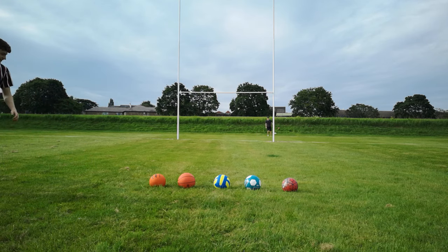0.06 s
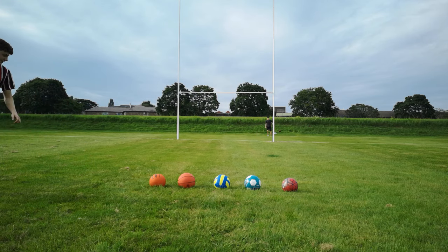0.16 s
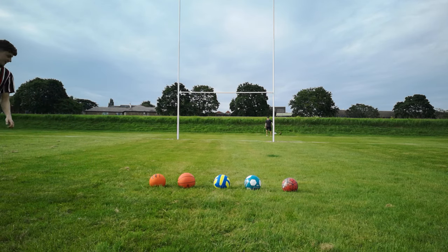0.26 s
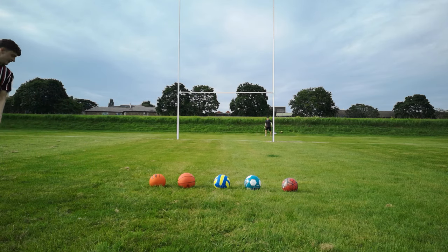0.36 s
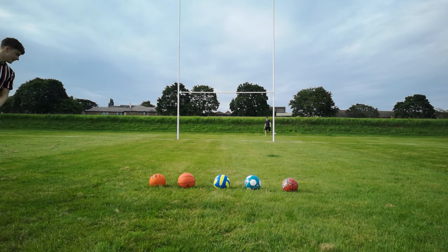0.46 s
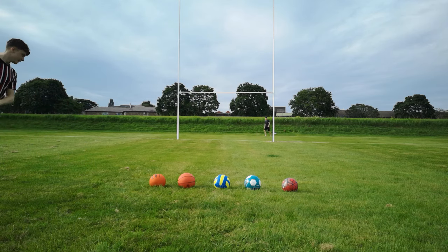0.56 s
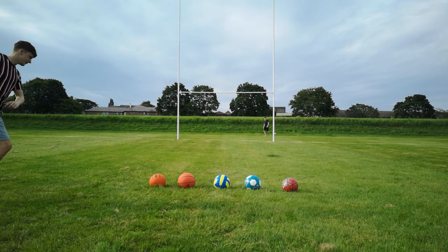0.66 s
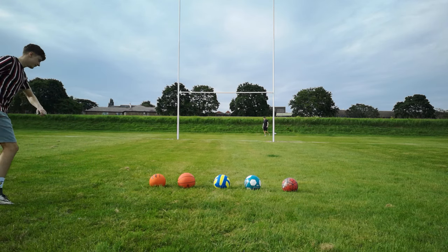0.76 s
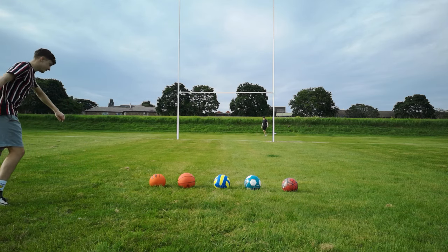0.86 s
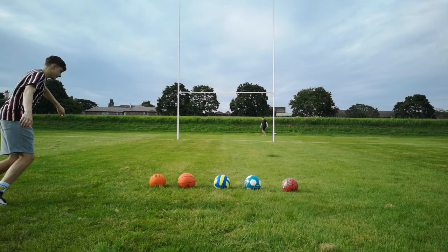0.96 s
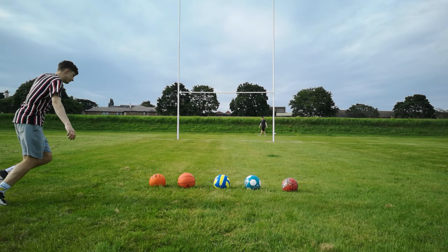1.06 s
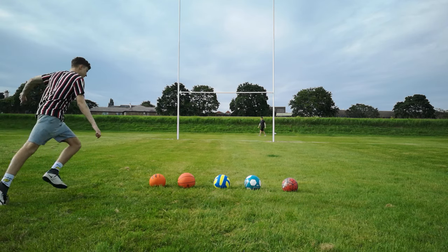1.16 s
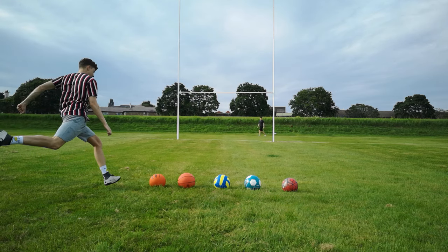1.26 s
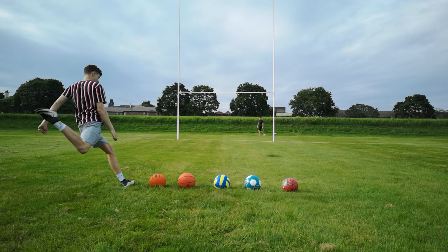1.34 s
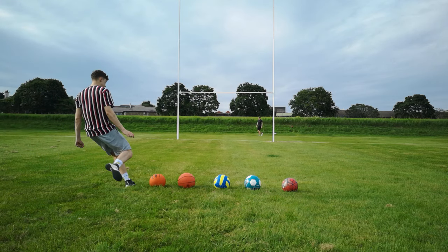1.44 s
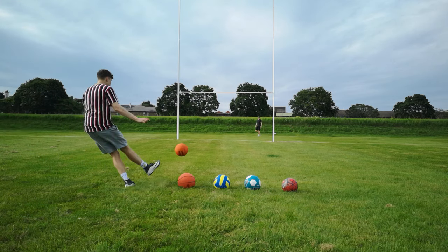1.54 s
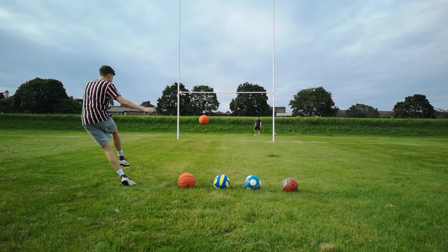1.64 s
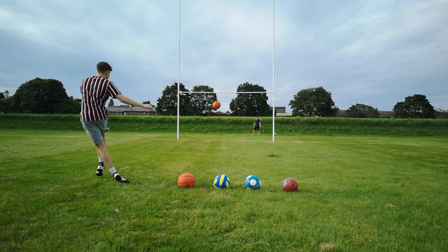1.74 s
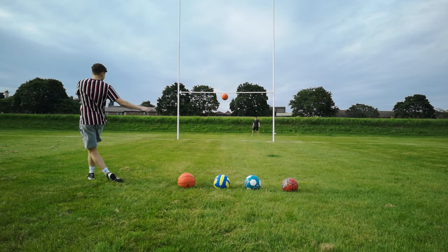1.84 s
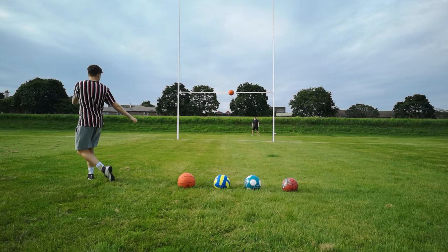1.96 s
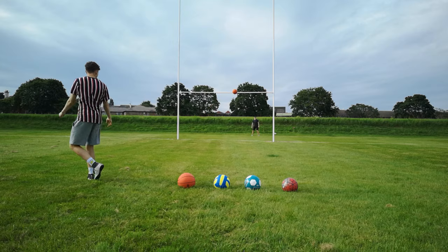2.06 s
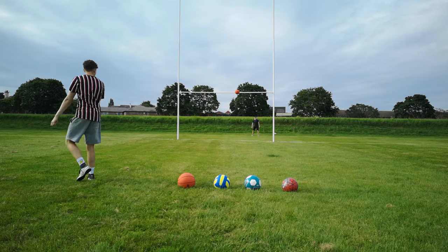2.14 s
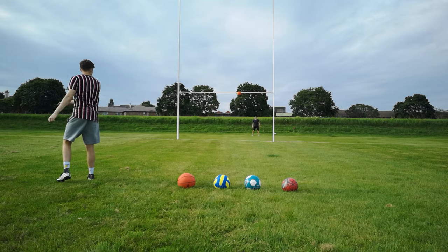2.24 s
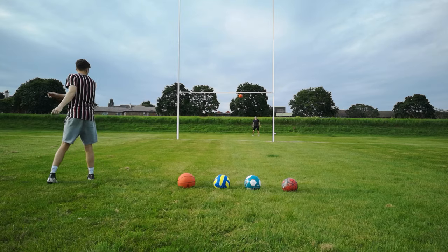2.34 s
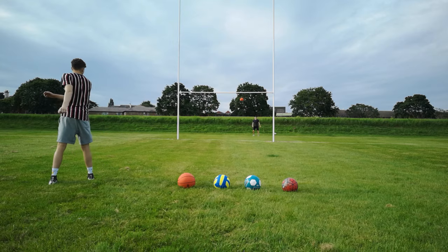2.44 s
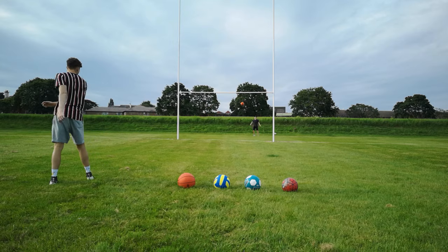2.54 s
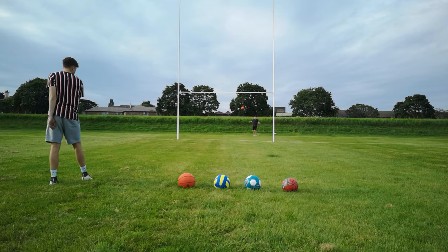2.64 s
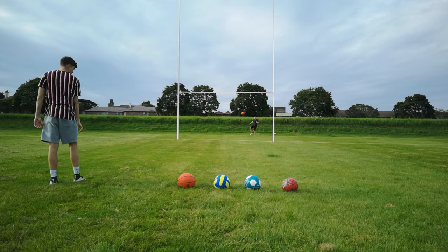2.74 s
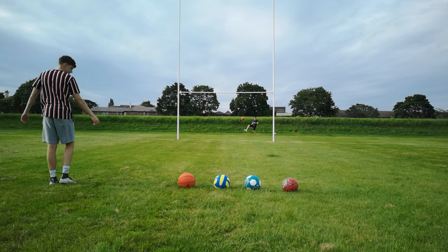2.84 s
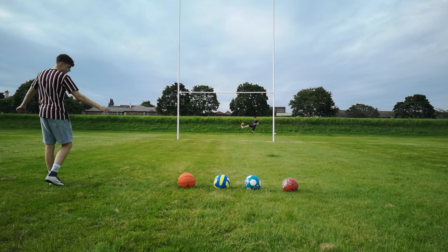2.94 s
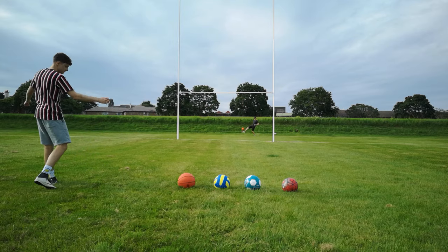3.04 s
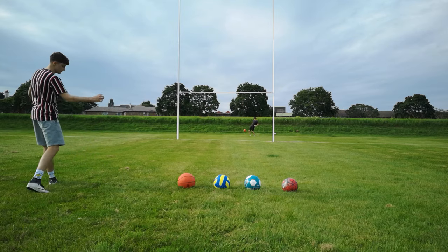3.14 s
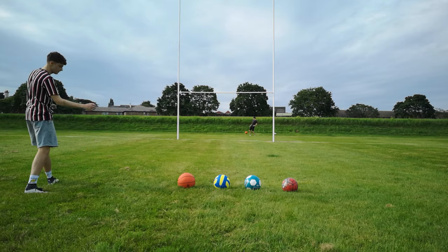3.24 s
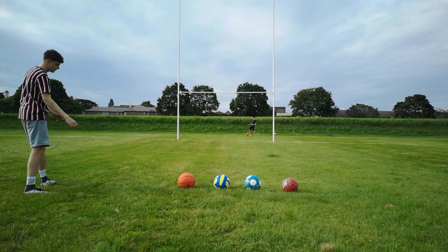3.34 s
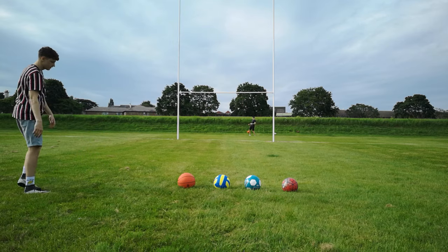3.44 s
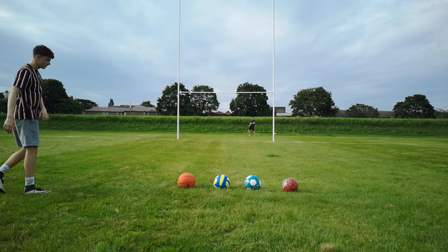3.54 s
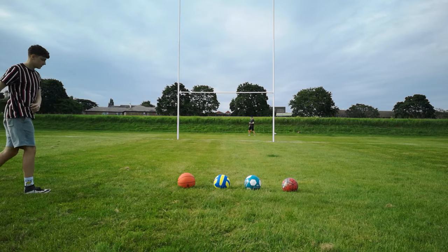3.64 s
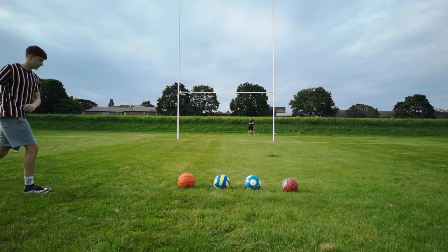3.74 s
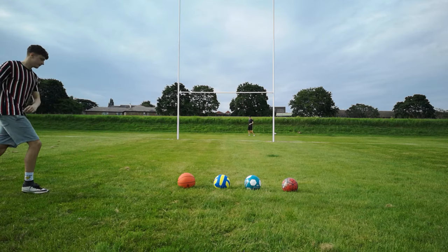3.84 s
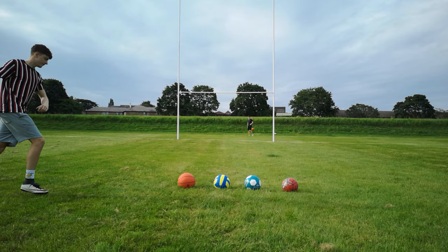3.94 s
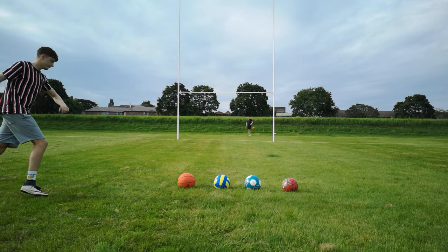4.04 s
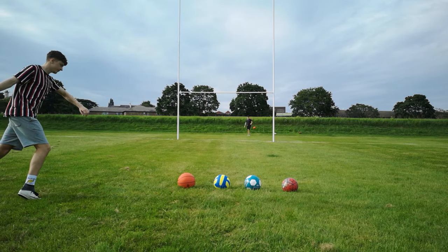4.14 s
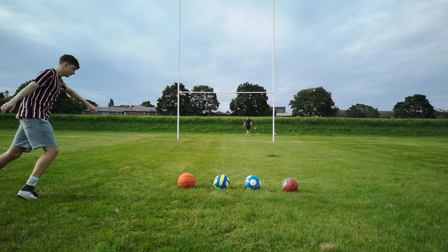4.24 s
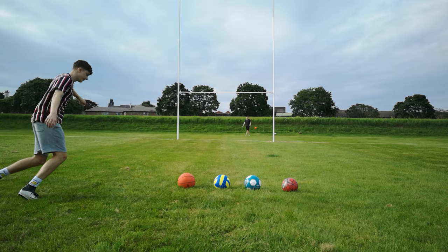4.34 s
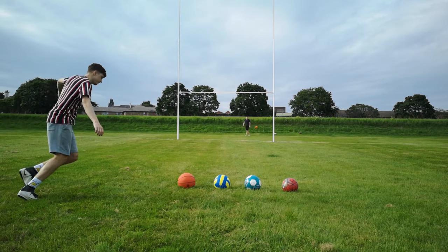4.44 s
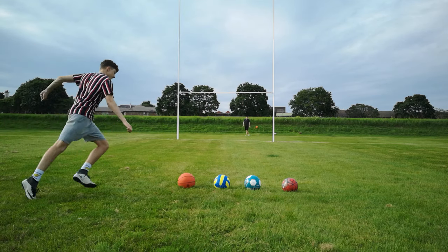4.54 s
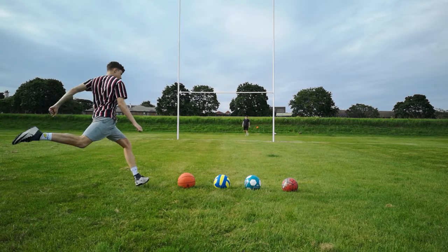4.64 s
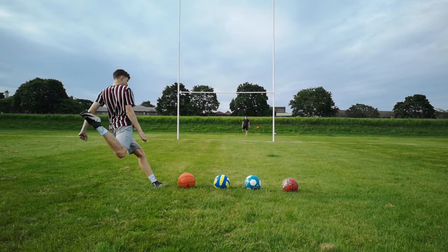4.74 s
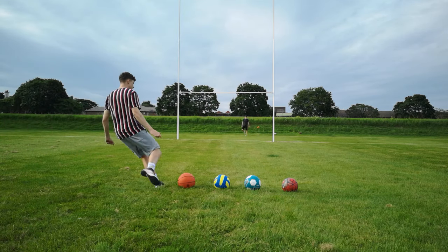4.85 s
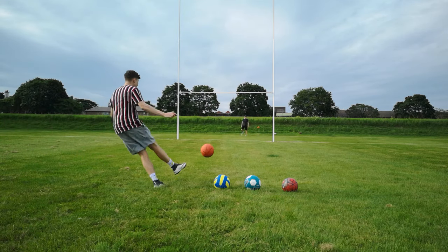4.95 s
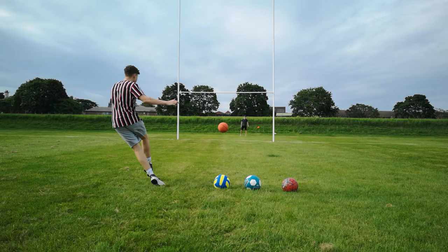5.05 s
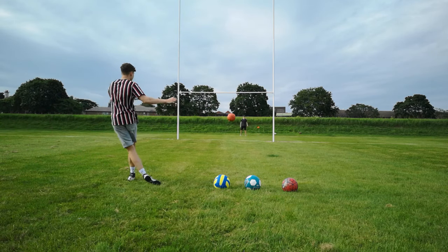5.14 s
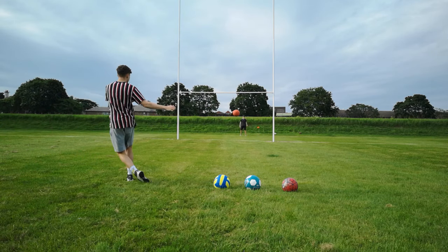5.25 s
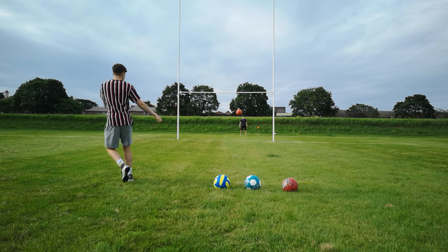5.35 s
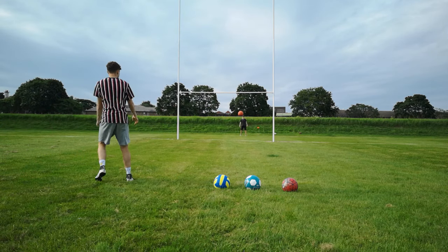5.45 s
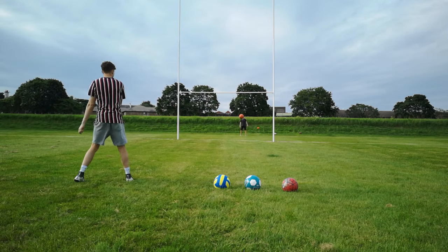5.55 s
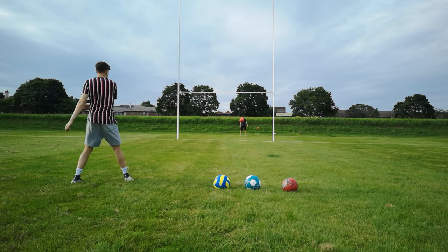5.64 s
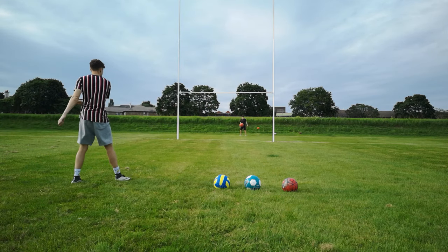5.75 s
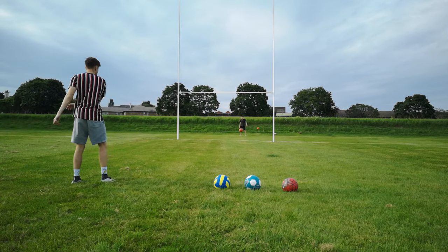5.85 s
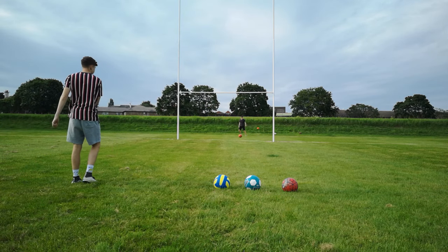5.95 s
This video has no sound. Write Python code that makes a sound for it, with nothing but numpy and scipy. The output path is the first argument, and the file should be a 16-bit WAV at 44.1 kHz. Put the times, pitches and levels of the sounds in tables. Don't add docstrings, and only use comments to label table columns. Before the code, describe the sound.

Two sharp booming ball kicks a few seconds apart on a quiet field, with soft footfalls, grass rustle and faint bird notes between.

```python
import sys
import numpy as np
from scipy import signal
from scipy.fft import rfft, irfft, next_fast_len
from scipy.io import wavfile
from scipy.ndimage import uniform_filter1d

SR = 44100
rng = np.random.default_rng(int(sys.argv[2]) if len(sys.argv) > 2 else 0)


def invert_db(x):
    u = np.asarray(x, float) / 20
    return 10 ** u


def log_audio(samples):
    frames = np.atleast_2d(samples).T
    limited = np.clip(frames, -1, 1)
    pcm = np.round(limited * 32767).astype(np.int16)
    wavfile.write(sys.argv[1], SR, pcm)


N = 264636
T = np.arange(N) / SR
LONG = next_fast_len(N)

# frequency in Hz, density in dB per Hz.
HISS_TONE = [(150, -31.5), (260, -7), (380, -7), (414, -8.5), (475, -10), (648, -8), (869, -4.5),
             (947, -6.5), (1010, -6), (1380, -10), (1760, -7), (5220, -20), (9870, -26.5), (11900, -27),
             (16000, -29.5)]
# frequency in Hz, density in dB per Hz.
RUMBLE_TONE = [(8.8, -36), (15, -1.5), (43, 1.5), (59, 0), (76, -4), (103, -8), (196, -18), (249, -21),
               (300, -32.5), (390, -62.5), (660, -120)]
# time in seconds, level in dB.
RUMBLE_HEAVE = [
    (0.0, -65.5),
    (1.3, -64.5),
    (1.59, -59.5),
    (1.82, -64),
    (3.44, -66),
    (3.91, -65),
    (4.44, -67),
    (5.0, -62),
    (5.21, -63.5),
    (6.0, -65.5),
]
# frequency in Hz, left-right correlation from -1 to 1.
LIKENESS = [(60, 0.99), (130, 0.95), (290, 0.13), (640, -0.64), (1410, 0.15), (3100, -0.16), (6820, -0.05),
            (15000, -0.35)]
# start in seconds, level in dB, hold in seconds.
SWISHES = [(0.0, -85, 0.026), (.14, -87, 0.087), (.76, -89, 0.14), (1.05, -91.5, 0.056),
           (1.225, -82.5, 0.0064), (1.40, -88.5, 0.058), (1.64, -88, 0.19), (1.85, -85, .04),
           (1.98, -90, 0.13), (2.32, -91.5, .1), (2.74, -90, .36), (3.38, -88.5, 0.29), (3.8, -94.5, 0.088),
           (4.17, -91.5, 0.048), (4.41, -95, 0.029), (4.615, -84, .01), (4.73, -90.5, 0.21),
           (5.06, -87, .28), (5.58, -85.5, 0.033), (5.81, -87, 0.21)]
# frequency in Hz, density in dB per Hz.
RUSTLE_TONE = [(1500, -29), (3000, -14), (5200, -2.5), (6400, -7), (7500, -4), (8300, -7.5), (9200, 0),
               (10400, -10.5), (12500, -21.5), (15500, -27)]
# start in seconds, level in dB, t60 in seconds.
WASH = [
    (1.565, -65, .3),
    (4.955, -58.5, .5),
]
# frequency in Hz, density in dB per Hz.
WASH_TONE = [(100, -3), (200, 4), (400, -5), (1000, -6.5), (2500, -3.5), (5500, -10), (9000, -20.5),
             (15000, -35)]
# start in seconds, length in seconds, first pitch in Hz, last pitch in Hz, level in dB.
BIRD = [(2.365, 0.034, 2450, 2234, -74), (2.461, 0.12, 1880, 1670, -78), (2.856, 0.049, 2440, 2270, -69.5),
        (3.429, 0.04, 2424, 2280, -73), (3.5, 0.21, 1918, 2030, -78), (3.835, 0.054, 2379, 2170, -75),
        (4.12, 0.096, 2350, 2380, -79), (3.929, .04, 3800, 4200, -83), (4.201, 0.12, 3280, 3180, -82.5),
        (4.288, 0.079, 2500, 2350, -76.5), (4.70, .015, 4560, 5000, -86), (4.775, 0.012, 4600, 5000, -79),
        (4.86, 0.0092, 4680, 4970, -78), (5.458, 0.068, 4900, 4100, -85)]
# start in seconds, level in dB, ground pitch in Hz,
# decay in ms, crunch in dB.
STEPS = [(0.396, -52, 116.4, 5.5, -82), (1.231, -56.5, 366, 1.8, -62), (1.418, -46.5, 186, 2.6, -85),
         (1.424, -47, 75, 12, -53), (2.162, -54.5, 111.5, 8.6, -86.5), (2.373, -55.5, 99, 9.1, -81),
         (2.734, -61.5, 174, 5.3, -79), (3.179, -48.5, 241, 3.7, -85), (3.475, -58.5, 121, 6.3, -83),
         (3.959, -49, 125, 4.4, -83), (4.614, -53.5, 225.5, 4.8, -63), (4.816, -50, 223, 2.4, -83),
         (4.818, -54.5, 93.4, 6.4, -55.5), (4.840, -64, 121, 5.8, -61.5), (5.549, -51.5, 90.6, 7.8, -85)]
# frequency in Hz, density in dB per Hz.
CRUNCH_TONE = [(180, -28.5), (300, -5.5), (674, -11), (1120, -8.5), (2830, -18), (4720, -33), (7020, -27),
               (8990, -25), (11100, -41.5), (15500, -49.5)]
# contact in seconds, blades in dB, blade lead in ms, crumbs in dB, # crumb fade
# in ms, low echo in dB.
SWEEPS = [
    (1.559, -45, 14, -40, 11.4, -44.5),
    (3.178, -68, 2.1, -54.5, 8, -62),
    (4.951, -50.5, 14, -35, 9.6, -41),
]
# frequency in Hz, density in dB per Hz.
BLADE_TONE = [(350, -30), (600, 6.5), (2040, -8.5), (2720, -9.5), (3290, -22.5), (5360, -10.5), (6490, -19),
              (9240, -9.5), (11600, -25.5), (14100, -24), (15500, -37)]
# frequency in Hz, density in dB per Hz.
CRUMB_TONE = [(350, -34.5), (600, -6), (1030, -4), (2910, -8.5), (5220, -19.5), (5980, -18), (6490, -31.5),
              (9240, -20.5), (11600, -39), (14900, -35.5), (15500, -48.5)]
# pitch in Hz, level in dB,
# t60 in seconds, lobes per second, first null in seconds, left minus right in dB.
SMALL_BALL = [(1014.6, -51, .14, 6.0, -.08, 7.5), (1583, -66.5, 0.26, 6.0, -.05, -5),
              (2207, -59, 0.32, 8.0, .012, 1), (2920, -69, 0.85, 11.0, .075, 8),
              (3326, -67, 0.13, 6.0, -0.049, 2.5), (3570, -69, 0.507, 6.1, 0.017, 2),
              (3810, -63, 0.1982, 7.41, -.05, -9), (4410, -59.5, .1, 6.0, -.04, -2.5),
              (4915, -75.5, .3, 5.0, -.05, 17), (5416, -76, .3, 5.0, -.05, 5.5),
              (5970, -76.5, 0.297, 4.95, -.05, 6)]
BIG_BALL = [(425, -40.5, 0.15, 3.5, -0.14, 3.5), (926, -59, 0.79, 2.6, -.07, 5),
            (1497, -64.5, 0.47, 10, .06, -3), (2005, -43.5, .33, 11, 0.014, -3),
            (2540, -51.5, 0.29, 12, -0.0059, 12), (2656, -55.5, 1.9, 5.0, 0.085, 2.5),
            (3020, -48.5, 0.27, 9.9, .024, 2.5), (3270, -57.5, 0.77, 2.3, 0.027, -1),
            (3510, -62, .8, 11, .08, 1.7), (3500, -66, .34, 5.3, -0.021, 0.2),
            (3880, -65, 0.74, 6.0, .12, -3), (3978, -55.5, .24, 6.6, 0.03, -2.5),
            (4350, -68.5, 0.32, 7.0, -.01, 1), (4463, -60, .26, 7.0, 0.00079, -4.5)]
# start in seconds,
# level in dB, centre in Hz, decay in ms, left minus right in dB.
ECHOES = [
    (1.6088, -43.5, 2260, 1.2, 2.5),
    (1.646, -59, 1320, 2.8, 0),
    (1.652, -60.5, 2220, 2.7, 1.5),
    (4.9606, -34.5, 1900, 2.2, 2.5),
    (4.9881, -43.5, 2270, 4.3, -0.5),
    (5.044, -57, 2160, 2.5, 4),
    (5.088, -64, 2170, 1.8, 8),
]
# start in seconds, level in dB, decay in ms, left minus right in dB,
# right ear delay in ms.
SLAPS = [
    (1.56, -17.5, 1.0, 6.5, 0.29),
    (3.1771, -39.5, 2.3, 3, 0.021),
    (4.9503, -11.5, 1.08, 5, 0.029),
]
# frequency in Hz, density in dB per Hz.
SLAP_TONES = [
    [(480, -37), (900, -0.5), (1670, -9), (2150, 0), (2770, -16), (3700, -13), (6070, -18), (6550, -30),
     (7820, -33.5), (8990, -12.5), (10300, -46.5), (12000, -41), (15500, -48.5)],
    [(590, -56), (1000, -20), (1320, -7.5), (1790, -10), (2970, -1), (4390, -6.5), (4810, -15), (5780, 6),
     (6560, -13.5), (7700, -5), (8250, -31), (9250, -7.5), (10700, -37), (14300, -44), (15500, -54)],
    [(450, -27.5), (720, 0.5), (1790, -8), (2760, -1.5), (3950, -9.5), (4830, -23), (5680, -10),
     (6430, -30.5), (7640, -11.5), (8550, -17), (9320, -6), (10400, -29.5), (12200, -46), (13400, -36),
     (15500, -50.5)],
]
# start in seconds, level in dB, breathing in Hz, peak in ms,
# width in ms, rise in ms.
THUDS = [
    (1.56, -3, 111.4, 1.9, 7.56, 0.26),
    (3.1768, -30.5, 108, 7.3, 7.2, 1.3),
    (4.9502, -3.5, 109.3, 3.5, 7.0, 0.11),
]
# multiple of breathing pitch, share, duration in ms.
WOBBLE = [
    (2.0, 0.035, 6),
    (3.0, -0.022, 12),
]

HISS_DB = -72.5
SWISH_RISE_S, SWISH_FALL_S = .03, 0.039
THUD_ECHO_PEAK_MS, THUD_ECHO_WIDTH_MS = 27, 13
LOBE_FILL = 0.19
SPHERE_HZ = 447
CROWD_DB, CROWD_DB_PER_KHZ, CROWD_SCATTER_DB = -69, -4, 3.5
CROWD_T60_S, CROWD_LOBES_HZ = 0.49, 7
FLIGHT_S = .62
MIC_LOW_HZ = 30.2


def on_log(table, n):
    hz, value = np.transpose(table)
    bin_hz = np.arange(n // 2 + 1) * SR / n
    return np.interp(np.log(bin_hz + 1), np.log(hz), value)


def noise(tone, n):
    x = irfft(rfft(rng.standard_normal(n)) * invert_db(on_log(tone, n)), n)
    return x / x.std()


def ringing(tone, n=1024):
    cepstrum = irfft(np.log(invert_db(on_log(tone, n))), n)
    cepstrum[1:n // 2] *= 2
    cepstrum[n // 2 + 1:] = 0
    response = irfft(np.exp(rfft(cepstrum)), n)[:n // 2]
    return response / np.sqrt(np.sum(response ** 2))


def crackle(decay_ms, n=1024):
    shape = np.exp(-np.arange(n) * 1000 / SR / decay_ms)
    x = rng.standard_normal(n)
    for _ in range(6):
        spectrum = rfft(x * shape)
        x = irfft(spectrum / np.abs(spectrum), n)
    x = x * np.sqrt(shape)
    return x * np.sqrt(np.sum(shape ** 2) / np.sum(x ** 2))


def walk(rate_hz):
    hold = int(SR / rate_hz)
    levels = np.repeat(rng.standard_normal(N // hold + 1), hold)
    return 2.2 * uniform_filter1d(uniform_filter1d(levels, hold), hold)[:N]


def add(out, s, x, pan_db=0., late_ms=0.):
    k = np.arange(len(x))
    left = x * invert_db(pan_db / 2)
    right = np.interp(k - late_ms * SR / 1000, k, x, left=0) * invert_db(-pan_db / 2)
    i = int(round(s * SR))
    out[:, i:i + len(x)] += np.array([left, right])[:, :N - i]


def diffuse(tone):
    likeness = np.clip(on_log(LIKENESS, LONG), -1, 1)
    gain = invert_db(on_log(tone, LONG))
    mid = rfft(rng.standard_normal(LONG)) * gain * np.sqrt(1 + likeness)
    side = rfft(rng.standard_normal(LONG)) * gain * np.sqrt(1 - likeness)
    pair = irfft([mid + side, mid - side], LONG)[:, :N]
    return pair / pair.std()


def hiss():
    return invert_db(HISS_DB + 0.39 * walk(1.3)) * diffuse(HISS_TONE)


def rumble():
    heave_db = np.interp(T, *np.transpose(RUMBLE_HEAVE))
    return invert_db(heave_db + 4.0 + 0.65 * walk(14)) * diffuse(RUMBLE_TONE)


def stirring():
    s, db, held = np.array(SWISHES).T[:, :, None]
    swell = -(np.minimum(T - s, 0) / SWISH_RISE_S) ** 2
    fall = -np.maximum(T - s - held, 0) / SWISH_FALL_S
    return np.sqrt(np.sum(invert_db(db) ** 2 * np.exp(swell + fall), axis=0))


def rustle():
    grain = stirring() * invert_db(4.5 + 2.1 * walk(72))
    return grain * np.array([noise(RUSTLE_TONE, LONG)[:N] for _ in range(2)])


def wash():
    fade = sum((T > s) * invert_db(db - 60 * np.maximum(T - s, 0) / t60) for s, db, t60 in WASH)
    return fade * diffuse(WASH_TONE)


def bird(out):
    for s, length, from_hz, to_hz, db in BIRD:
        u = np.arange(int(length * SR)) / (length * SR)
        phase = 2 * np.pi * np.cumsum(from_hz + (to_hz - from_hz) * u) / SR
        add(out, s, invert_db(db) * np.sin(np.pi * u) ** 0.86 * np.sin(phase), .1, 0.)


def steps(out):
    ms = np.arange(4096) * 1000 / SR
    for s, db, hz, decay, crunch_db in STEPS:
        thump = np.sin(2 * np.pi * hz * ms / 1000) * (ms / decay) * np.exp(1 - ms / decay)
        crunch = noise(CRUNCH_TONE, 4096) * (ms / 4.6) * np.exp(1 - ms / 3.62)
        add(out, s, invert_db(db) * thump + invert_db(crunch_db) * crunch, 2.5 * (hz / 330), .45)


def sweeps(out):
    ms = (np.arange(8192) - 2048) * 1000 / SR
    echo_shape = np.exp(-((ms - THUD_ECHO_PEAK_MS) / THUD_ECHO_WIDTH_MS) ** 2)
    echo_tone = [(30, -21.5), (70, -6), (130, -1.0), (260, -5.0), (450, -19), (1200, -46.5)]
    for s, blade_db, lead, crumb_db, fade, echo_db in SWEEPS:
        add(out, s - 2048 / SR, invert_db(echo_db) * noise(echo_tone, 8192) * echo_shape, 0., .4)
        blades = invert_db(blade_db) * np.exp(-(np.where(ms < 0, ms, 1.2 * ms) / lead) ** 4)
        dying = np.exp(-np.maximum(ms, 0) / fade) * (ms > 0)
        i = int(s * SR) - 2048
        for ear in out:
            grain = invert_db(2.7 * rng.standard_normal(256).repeat(32))
            patter = noise(CRUMB_TONE, 8192)
            dull = uniform_filter1d(patter, size=5)
            crumbs = invert_db(crumb_db) * (dull * dying + (patter - dull) * dying ** 2)
            ear[i:i + 8192] += grain * (blades * noise(BLADE_TONE, 8192) + crumbs)


def sphere(low=10.3, high=17.3):
    u, weight = np.polynomial.legendre.leggauss(40)
    x = np.arange(low, high, .004)
    shapes = np.polynomial.legendre.legvander(u, 16).T
    slope = [np.cos(np.outer(x, u) + np.pi / 2 * (1 - n)) @ (weight * u * p) for n, p in enumerate(shapes)]
    return np.sort(x[np.nonzero(np.diff(np.sign(slope), axis=1))[1]])


def crowd():
    hz = SPHERE_HZ * sphere()
    scatter, null, pan = rng.standard_normal((len(hz), 3)).T
    db = CROWD_DB + CROWD_DB_PER_KHZ * (hz - hz[0]) / 1000 + CROWD_SCATTER_DB * scatter
    return [(f, d, CROWD_T60_S, CROWD_LOBES_HZ, 0.063 * n, 3 * p) for f, d, n, p in zip(hz, db, null, pan)]


def rings(out):
    for s, modes in ((THUDS[0][0], SMALL_BALL), (THUDS[2][0], BIG_BALL + crowd())):
        for (hz, db, t60, spin, null, pan_db), turn in zip(modes, rng.random(len(modes))):
            t = T[:int(min(t60, 1) * SR)]
            lobes = np.sin(np.pi * spin * (t - null)) + 1j * LOBE_FILL
            tone = np.real(lobes * np.exp(2j * np.pi * (hz * t + turn))) * invert_db(db - 60 * t / t60)
            flight = np.clip(t / .004, 0, 1) * np.exp(-(t / FLIGHT_S) ** 6)
            add(out, s, tone * flight, pan_db, .02)


def echoes(out):
    for s, db, hz, decay, pan_db in ECHOES:
        tone = [(hz / 3.2, -30), (hz / 1.2, -2.5), (hz * 1.1, -.1), (hz * 2.6, -15), (hz * 5.5, -45)]
        add(out, s, invert_db(db) * np.convolve(crackle(decay), ringing(tone)), pan_db, .1)


def slaps(out):
    for (s, db, decay, pan_db, late_ms), tone in zip(SLAPS, SLAP_TONES):
        add(out, s, -invert_db(db) * np.convolve(crackle(decay), ringing(tone)), pan_db, late_ms)


def thuds(out, late_ms=0.33, sag_per_ms=0.0094):
    ms = np.arange(-220, 1800) * 1000 / SR
    for (s, db, hz, peak, width, rise), near in zip(THUDS, (1, 0, 1)):
        turns = 2 * np.pi * hz * 1.092 * ms * (1 - sag_per_ms * ms) / 1000
        breath = np.exp(-((ms - peak) / width) ** 2) * np.cos(turns)
        wobble = sum(share * np.exp(-(ms / lasting) ** 2 / 2) * np.cos(k * turns) for k, share, lasting in WOBBLE)
        onset = 1 / (1 + np.exp(-ms / rise))
        add(out, s - 220 / SR, -invert_db(db) * (breath + wobble) * onset, -.2, late_ms * near)


def scene():
    out = hiss() + rumble() + rustle() + wash()
    for source in (bird, steps, sweeps, rings, echoes, slaps, thuds):
        source(out)
    return out


def low_pass(x):
    return signal.sosfilt(signal.butter(12, 16240, fs=SR, output="sos"), x)


def record(dry):
    thin = signal.sosfilt(signal.butter(1, MIC_LOW_HZ, "high", fs=SR, output="sos"), dry)
    return low_pass(thin)


dry = scene()
out = record(dry)
log_audio(out)
```